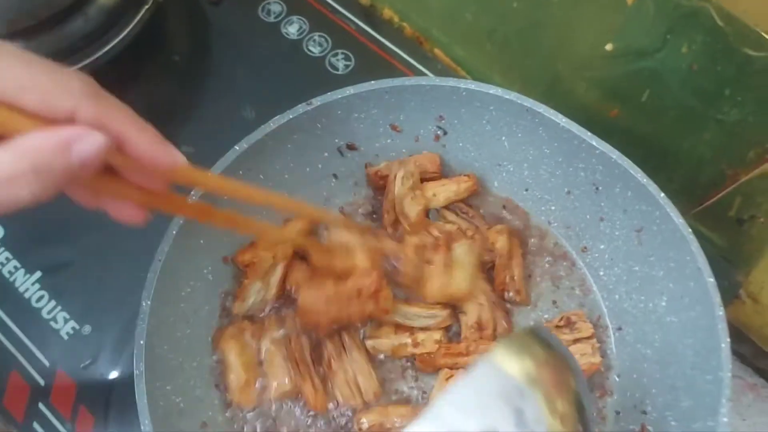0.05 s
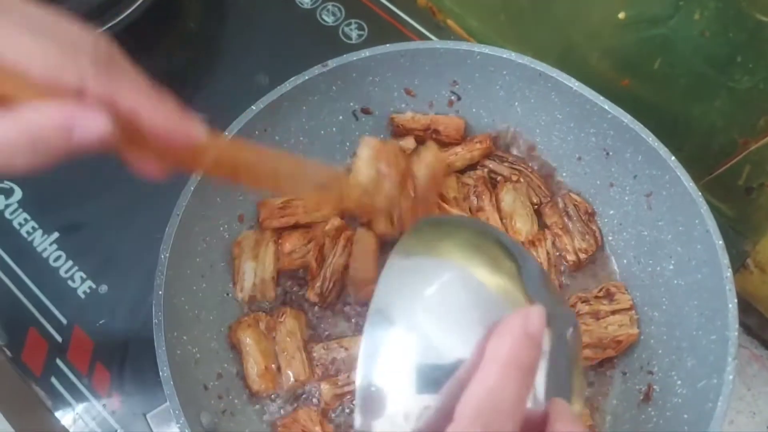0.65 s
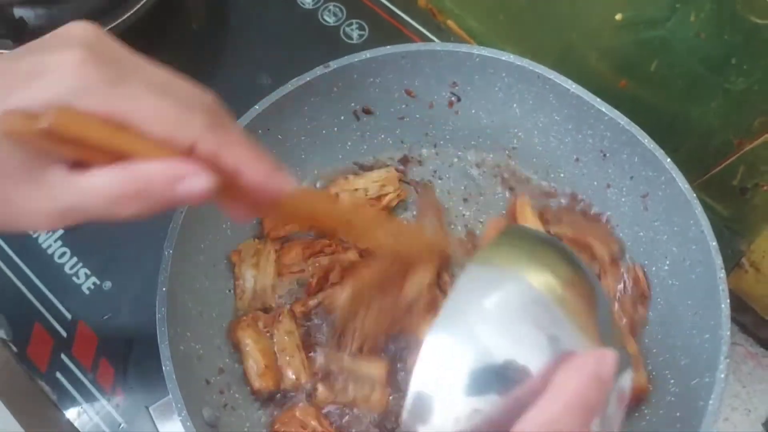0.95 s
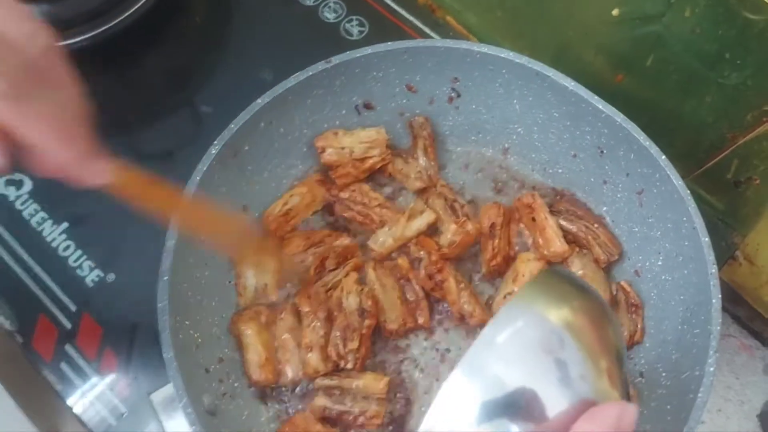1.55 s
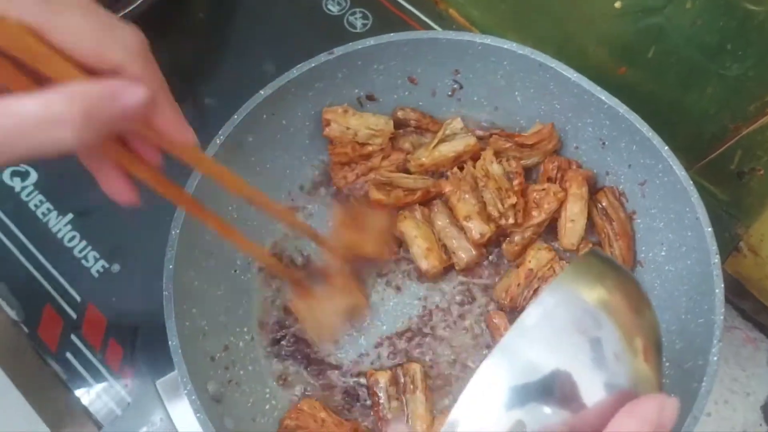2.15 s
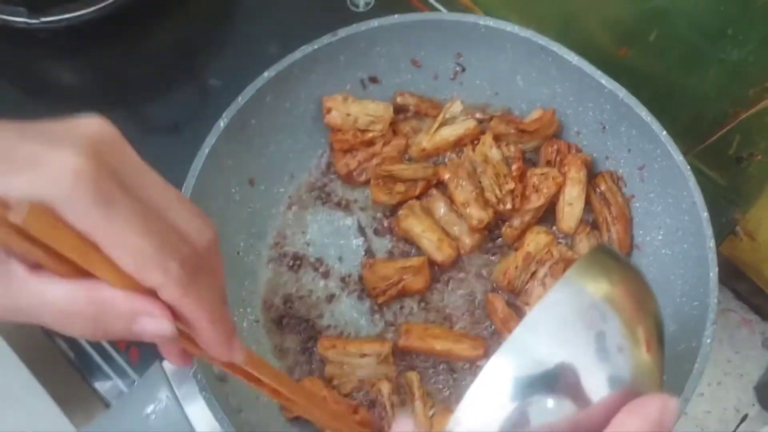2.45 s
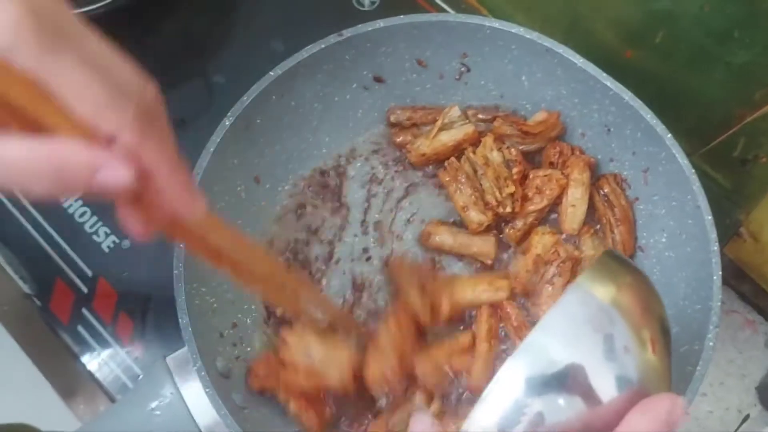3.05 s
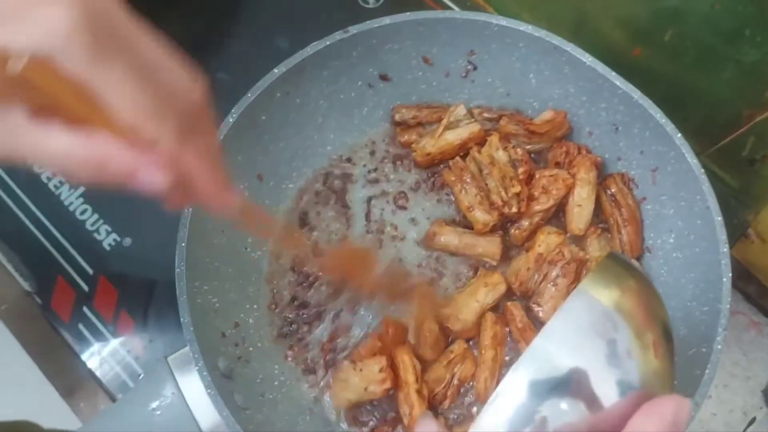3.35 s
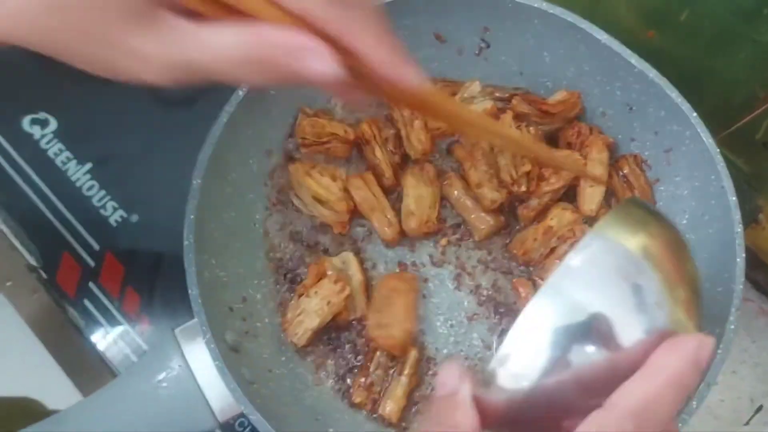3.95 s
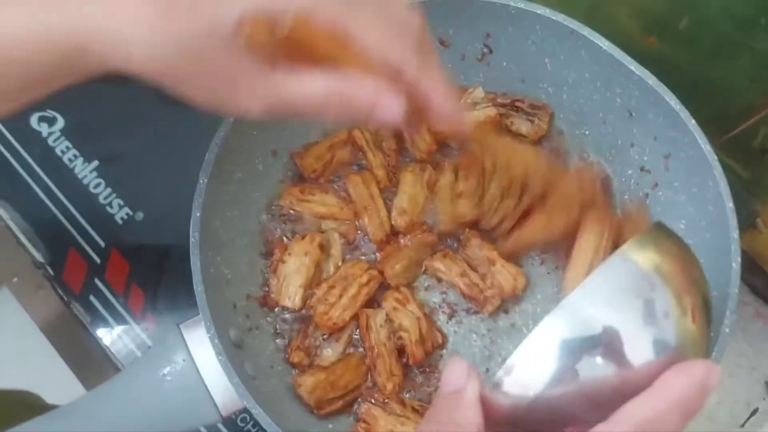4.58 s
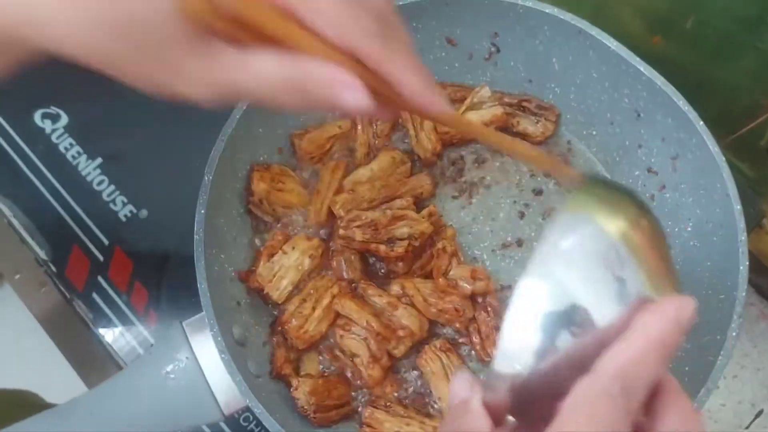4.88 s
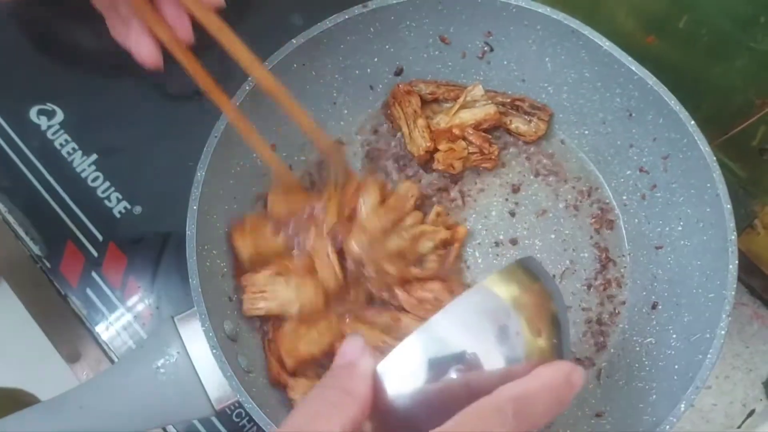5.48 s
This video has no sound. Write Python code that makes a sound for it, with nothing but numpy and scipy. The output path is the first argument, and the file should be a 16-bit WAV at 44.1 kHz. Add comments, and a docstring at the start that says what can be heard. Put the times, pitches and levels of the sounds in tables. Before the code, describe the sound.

Close, crackling sizzle of tofu strips frying in a little sauce, easing slightly, while an electric cooktop hums underneath.

```python
"""Tofu skin frying on an electric hob

Close above a nonstick pan, in stereo: strips of tofu skin fry in a little sauce, stirred with chopsticks.
Thousands of tiny bubbles burst, oil spits and a steel bowl beside the pan ticks now and then; underneath,
the hob hums and its fan blows. Late on, something (probably a finger) bumps the right microphone and
closes in on it, hollowing the sizzle on that side."""
import sys
import numpy as np
from scipy import signal
from scipy.fft import rfft, irfft, next_fast_len
from scipy.io import wavfile

SR = 44100
rng = np.random.default_rng(int(sys.argv[2]) if len(sys.argv) > 2 else 0)


def output_pcm(signal):
    """Save a mono or channel-first signal as 16-bit PCM at the path in sys.argv[1].

    Samples are clipped to [-1, 1] before scaling.
    """
    pcm = np.clip(np.atleast_2d(signal).T, -1, 1) * 32767
    wavfile.write(sys.argv[1], SR, np.round(pcm).astype(np.int16))


N = 243431
TIME = np.arange(N) / SR
AGE = TIME[:SR // 6]   # time since a blow
PADDED = next_fast_len(N, real=True)
FREQS = np.maximum(np.fft.rfftfreq(PADDED, 1 / SR), 1)


def from_db(db):
    """Decibels to gain."""
    return 10 ** (np.asarray(db) / 20)


def panned(balance_db):
    """Left and right gains; a positive balance leans left."""
    return from_db(np.array([[.5], [-.5]]) * balance_db)


def in_time(rows):
    """Each column of a curve, sample by sample."""
    s, *columns = np.transpose(rows)
    return [np.interp(TIME, s, column) for column in columns]


def at_hz(points):
    """A curve read at every frequency, on a log axis."""
    hz, value = np.transpose(points)
    return np.interp(np.log(FREQS), np.log(hz), value)


def as_wave(spectrum):
    """From a stereo spectrum to sound, with rms 1 in the middle of the pair."""
    wave = irfft(spectrum, PADDED)[:, :N]
    return wave / np.sqrt(np.mean(wave.mean(0) ** 2) + 1e-20)


def wander(step_s):
    """A new random value at every step, joined by straight lines."""
    return np.interp(TIME / step_s, np.arange(400), rng.standard_normal(400))


def hump(x, centre, width):
    """A bell curve of height 1."""
    return np.exp(-((x - centre) / width) ** 2)


def band(x, hz, octaves):
    """A broad, quickly dying resonance."""
    edges = np.clip([hz * 2 ** (-octaves / 2), hz * 2 ** (octaves / 2)], [10, 20], [SR * .42, SR * .48])
    return signal.sosfilt(signal.butter(1, edges, "band", fs=SR, output="sos"), x + 1e-18)


def burst(t60):
    """A sudden puff of stereo noise that dies away."""
    return rng.standard_normal((2, len(AGE))) * from_db(-60 * AGE / t60)


def lingering(energy, t60):
    """Energy spread out over a dying echo."""
    decay = 10 ** (-6 / (t60 * SR))
    return signal.lfilter([1 - decay], [1, -decay], energy + 1e-18)


def add(out, s, sound):
    """Mix a short sound in at a moment."""
    start = round(s * SR)
    out[:, start:start + sound.shape[-1]] += sound[:, :N - start]


# Fan and rumble under the pan: (frequency [Hz], relative density [dB])
FAN_SPECTRUM = [(70, -29), (125, -14.5), (167, -9.5), (205, -11), (285, -13), (335, -9), (460, -14.5),
                (525, -13.5), (600, -13.5), (720, -2.5), (790, -5.5), (870, -2.5), (1060, -8), (1210, -6.5),
                (1400, -8.5), (1900, -36), (3000, -90)]
RUMBLE_SPECTRUM = [(20, -24), (35, -19), (52, 2), (66, -7), (85, -0.5), (125, -6), (160, -7.5),
                   (250, -29.5)]
# Where both sit between the microphones: (frequency [Hz], left minus right [dB])
AIR_BALANCE = [(150, -3), (350, -0.5), (520, -6.5), (700, -0.5), (1000, 3), (1250, -4.5)]
# How alike they are at the two microphones: (frequency [Hz], correlation [0-1])
AIR_CORRELATION = [(40, .75), (100, 0.99), (300, 0.85), (750, 0.77), (1300, 0.76)]
# Brief dips in hum and rumble: (time [s], gain [dB])
HUM_DIPS = [(0.72, -4), (1.4, -4), (2.92, -4)]


def hob(hum_hz=100.05, hum_db=-40, growth_db_per_s=1.04, waver_db=0.57, rumble_db=-16.5, fan_db=-38):
    """The hob hums at twice the mains rate, a faint rumble in step; its fan blows through the vents."""
    hum = np.sqrt(2) * np.sin(2 * np.pi * hum_hz * TIME) * panned(-2.2)
    mid, side = rfft(rng.standard_normal((2, PADDED)))
    alike = at_hz(AIR_CORRELATION)
    air = np.sqrt(1 + alike) * mid + np.sqrt(1 - alike) * side * [[1], [-1]]
    air *= panned(at_hz(AIR_BALANCE))
    fan = from_db(fan_db) * as_wave(air * from_db(at_hz(FAN_SPECTRUM)))
    rumble = from_db(rumble_db) * as_wave(air * from_db(at_hz(RUMBLE_SPECTRUM)))
    dips_db = sum(db * hump(TIME, s, width=0.031) for s, db in HUM_DIPS)
    level_db = hum_db + growth_db_per_s * TIME + dips_db + waver_db * wander(step_s=0.1)
    return from_db(level_db) * (hum + rumble) + fan


def microphone_bump(at_s=4.3344, thud_db=-8.5, scuff_db=-19, start_hz=720, end_hz=85,
                    glide_s=0.00195, rise_s=0.00037, t60=0.04):
    """A soft knock on the right microphone: a pressure swing that slows as it dies, and a light scuff."""
    hz = end_hz + (start_hz - end_hz) * np.exp(-AGE / glide_s)
    envelope = (1 - np.exp(-AGE / rise_s)) * from_db(thud_db - 60 * AGE / t60)
    thud = envelope * np.sin(2 * np.pi * np.cumsum(hz) / SR)
    scuff = from_db(scuff_db) * band(burst(t60=.025), hz=900, octaves=1.7)
    out = np.zeros((2, N))
    add(out, at_s, (thud + scuff) * [[0], [1]])
    return out


# The gap closing at the right microphone: (time [s], lowest notch [Hz], resonance height [dB])
GAP_CLOSING = [(4.42, 16000, 0), (4.52, 11630, 0), (4.6, 8300, 0), (4.66, 6240, 4), (4.72, 3950, 2),
               (4.79, 2980, 2), (4.9, 2660, 2), (5.15, 2340, 1), (5.5, 2350, 1)]
# Its notches: (centre [x lowest notch], width [x lowest notch], gain when sealed [dB])
GAP_NOTCHES = [(1, .2, -11), (2.07, .22, -6.5), (3.15, .25, -5), (4.0, .25, -4), (5.6, .4, -2)]
# Its resonances: (centre [x lowest notch], width [x lowest notch])
GAP_RESONANCES = [(1.7, .28), (3.5, .4)]


def closing_gap(x, start_s=4.4, fade_in_s=.24, tremble_octaves=0.05, leak_hz=8000, top_hz=15200):
    """Notches and resonances slide and tremble with the gap's width; nearly shut, it rings up top."""
    hz, s, frames = signal.stft(x, SR, nperseg=512)
    hz = hz[:, None]
    notch_hz, height_db = in_time(GAP_CLOSING)
    lowest_hz = np.interp(s, TIME, notch_hz * 2 ** (tremble_octaves * wander(step_s=0.063)))
    multiple = hz / lowest_hz
    sealed = 1 / np.sqrt(1 + (lowest_hz / leak_hz) ** 2)
    colour_db = 0
    for centre, width, db in GAP_NOTCHES:
        uneven = 1 + 0.29 * np.interp(s, TIME, wander(step_s=0.066))
        colour_db += db * sealed ** centre * uneven * hump(multiple, centre, width)
    for centre, width in GAP_RESONANCES:
        colour_db += np.interp(s, TIME, height_db) * hump(multiple, centre, width)
    cavity_db = 2 * hump(hz, centre=11100, width=700) + 4 * hump(hz, top_hz, width=1000)
    colour_db += cavity_db * np.clip(top_hz / lowest_hz - 1, 0, 1)
    fade_in = np.clip((s - start_s) / fade_in_s, 0, 1)
    return signal.istft(frames * from_db(fade_in * colour_db), SR)[1][:N]


# Modes of the steel bowl, held beside the pan: (frequency [Hz], relative level [dB], t60 [s])
BOWL_MODES = [(6020, -4, .026), (6170, -8, .02), (6315, -1, .028), (6495, -6, .024), (6630, -9, .018),
              (7880, -8, .025), (8400, -11, .022), (9600, -8, .025), (9880, -6, .028), (10110, -4, .034),
              (10750, -7, .025), (11070, -7, .018), (11750, -8, .018), (12700, -8, .018), (14700, -9, .012)]
# Touches on it: (time [s], ring gain [dB], knock gain [dB], left minus right [dB], tilt [dB/octave])
BOWL_TAPS = [(1.727, -13, -30, -1, 7), (3.706, -12.5, -18, 5, 0), (3.7075, -13.5, -20, 0, 0),
             (3.728, -31, -16, 0, -3), (5.4046, -6.5, -22, 0, 6), (5.406, -7.5, -29, -7, -2),
             (5.412, -15, -36, -10, 1)]


def bowl_taps(ring_db=-9, clatter_db=-20):
    """Each touch rings the bowl's modes, damped by the hand, over the dry knock of the chopstick."""
    out = np.zeros((2, N))
    hz, mode_db, t60 = np.transpose(BOWL_MODES)[:, :, None]
    for s, gain_db, knock_db, balance_db, tilt_db in BOWL_TAPS:
        phases = rng.uniform(0, 2 * np.pi, (2, len(BOWL_MODES), 1))
        envelopes = from_db(ring_db + mode_db + tilt_db * np.log2(hz / hz[0]) - 60 * AGE / t60)
        ring = (envelopes * np.sin(2 * np.pi * hz * AGE + phases)).sum(1)
        clatter = from_db(clatter_db + tilt_db) * band(burst(t60=0.029), hz=12000, octaves=1)
        knock = from_db(knock_db) * band(burst(t60=0.033), hz=3200, octaves=3.2)
        add(out, s, from_db(gain_db) * panned(balance_db) * (ring + clatter) + knock)
    return out


# Wet strips meeting hot metal: (time [s], length [s], typical bubble level [dB], pitch [Hz])
WET_SPUTTERS = [(0.22, 0.018, -19, 4130), (0.262, 0.03, -21, 4150), (0.333, .012, -23, 3030),
                (1.52, .06, -28, 4170), (1.61, 0.05, -23, 4030), (1.885, .02, -24, 4060),
                (2.769, 0.033, -34, 4320), (3.211, 0.024, -24, 4030), (3.26, 0.033, -36, 4300),
                (3.515, 0.031, -25, 4140), (3.608, 0.02, -27, 4200), (3.768, 0.033, -22.5, 3900),
                (4.843, .04, -26, 4100), (5.049, 0.021, -24.5, 3670)]


def sputters(stray_per_s=4, bubble_count=14, scatter_octaves=0.056, t60=0.0062, spread_db=3):
    """Quick clusters of like-sized bubbles, each ringing briefly; stray clusters come at random."""
    out = np.zeros((2, N))
    age = AGE[:SR // 40]
    chance = rng.random((round(stray_per_s * N / SR), 2))
    strays = [(when * TIME[-1], .015, -27, 2300 * 3 ** pitch) for when, pitch in chance]
    for s, length, level_db, hz in list(WET_SPUTTERS) + strays:
        for when, pitch, size, phase in rng.uniform(-1, 1, (bubble_count, 4)):
            bubble_hz = hz * 2 ** (scatter_octaves * pitch)
            ring = np.sin(2 * np.pi * bubble_hz * age + np.pi * phase * np.array([[0], [1]]))
            envelope = from_db(level_db + spread_db * size - 60 * age / t60)
            add(out, s + length * (when + 1) / 2, panned(-2) * envelope * ring)
    return out


# Spits from the pan at set moments: (time [s], gain [dB], pitch [Hz], left minus right [dB])
OIL_SPITS = [(0.323, -13, 4000, -5.5), (1.3882, -19, 11000, -5), (2.11, -13, 9000, -3),
             (2.176, -16, 7000, -4), (2.3997, -17, 3070, -4.5), (2.5194, -22, 3130, -4.0),
             (2.6289, -23, 9000, -1), (2.7367, -17, 7000, -1), (2.7731, -13, 9140, 0),
             (2.9607, -22, 8500, -6.5), (3.05, -16, 9000, -4), (3.2592, -17, 2900, -4.0),
             (3.3947, -18, 12500, -6), (3.8297, -15, 2820, -1), (3.83, -17, 12000, -1),
             (4.0694, -16, 11500, -4.0), (4.9935, -16, 13000, -5), (5.0554, -14, 11400, -3.5),
             (5.3393, -17, 10800, -6)]


def oil_spits(stray_per_s=4, crack_db=-1, spray_db=-4.5):
    """A larger drop bursts with a crack and a short spray; stray spits fall at random times and pitches."""
    out = np.zeros((2, N))
    chance = rng.random((round(stray_per_s * N / SR), 2))
    strays = [(when * TIME[-1], -16.5, 4500 * 3 ** pitch, -2) for when, pitch in chance]
    for s, gain_db, hz, balance_db in list(OIL_SPITS) + strays:
        crack = from_db(crack_db) * burst(t60=0.003)
        spray = from_db(spray_db) * burst(t60=0.064)
        add(out, s, from_db(gain_db) * panned(balance_db) * band(crack + spray, hz, octaves=0.86))
    return out


# Vigour of the frying, as heard in its finest fizz: (time [s], relative level [dB])
FRYING_VIGOUR = [(0.0, -29), (0.97, -33.5), (1.03, -31.5), (1.92, -31.5), (2.93, -40.5), (2.98, -35.5),
                 (4.17, -40), (5.35, -37)]


def oil_swing_db(share=0.39):
    """The oil crackles more or less as the frying gains or loses vigour."""
    vigour_db, = in_time(FRYING_VIGOUR)
    return share * (vigour_db - vigour_db.mean())


def droplet_snaps(per_s=30, gain_db=-8.5, spread_db=2.5):
    """The tiniest droplets snap in a single sharp click, most of them nearer one microphone."""
    at = np.flatnonzero(rng.random(N) < per_s / SR)
    size, side, sign = rng.uniform(-1.7, 1.7, (len(at), 3)).T
    clicks = np.zeros((2, N))
    clicks[:, at] = np.sign(sign) * from_db(gain_db + spread_db * size) * panned(-2 + 5 * side)
    return from_db(oil_swing_db()) * band(clicks, hz=12000, octaves=2.6)


# Brief swells, dips and narrow rings in the sizzle, some from stirring:
# (time [s], length [s], left swell [dB], right swell [dB], pitch [Hz], width [octaves])
SIZZLE_SWELLS = [(0.0, 0.78, .5, 3, 4160, .12), (0.05, 0.08, 3.5, 5, 3300, 0.97),
                 (0.13, 0.24, 2, 3, 4200, 1.3), (0.38, 0.26, 1.5, 1.5, 4200, .8),
                 (0.933, 0.17, 1.5, 3.5, 2670, .8), (1.073, 0.42, -3, -1.5, 2690, 1.2),
                 (1.07, .17, -2, 2.5, 13000, .6), (1.49, 0.15, 0, 1.5, 3600, 1.0),
                 (1.54, 0.13, 0, 3, 14000, 0.18), (1.88, .11, -1, 1.5, 9500, 1.0),
                 (1.905, 0.1, 5, 4, 2620, 1.1), (2.089, 0.073, 4.5, 3.5, 3000, 1.7),
                 (2.275, 0.086, 2.5, 2.5, 2400, 1.0), (2.888, 0.092, -5, -4, 4800, 1),
                 (2.95, 0.072, 1, 2, 2800, 1.0), (3.288, 0.058, -3.5, -1, 5000, 2.1),
                 (3.33, .42, -2, 0.5, 8000, 0.89), (3.8, 0.61, 5, 2.5, 1450, 0.74),
                 (3.85, 0.15, 1, 3, 6400, 0.82), (4.022, 0.63, -3, 0, 7500, 1.2),
                 (4.37, .07, 1, 6, 12800, .25), (4.44, .13, 0, -4, 11000, .7),
                 (4.537, .26, 2.5, -1, 2600, 1.7), (4.673, 0.15, 2, 3, 12500, 0.63),
                 (4.88, 0.49, -2, 0.5, 6100, 0.41), (4.95, 0.54, 4.5, 1, 1760, .3)]


def swells_and_dips(x, jostle_db=0.76, attack_s=0.031, release_s=0.028):
    """The sizzle briefly swells or thins around one pitch or another; small nudges jostle it throughout."""
    jostle = from_db(jostle_db * wander(step_s=.06)) - 1
    out = x + jostle * band(x, hz=3300, octaves=1.4)
    for s, length, left_db, right_db, hz, octaves in SIZZLE_SWELLS:
        span = slice(int(s * SR), int((s + length) * SR))
        age = TIME[span] - s
        envelope = np.clip(np.minimum(age / attack_s, (length - age) / release_s), 0, 1)
        swell = from_db([[left_db], [right_db]]) - 1
        out[:, span] += swell * envelope * band(x[:, span], hz, octaves)
    return out


def bubbles(per_s=7000, bands=14, clump_db=1.67, wall_db=0.5, wall_t60=0.08, room_db=1):
    """Bubbles burst in random clumps; each is a click, echoes off the pan wall and a wash in the room."""
    out = 0
    # the smallest, highest bubbles vary most in strength
    for hz, spread_db in zip(np.geomspace(1100, 17000, bands), np.linspace(3.5, 4, bands)):
        clumps = from_db(clump_db * np.repeat(rng.standard_normal(N // 800 + 1), 800)[:N])
        at = np.flatnonzero(rng.random(N) < per_s * clumps / bands / SR)
        sizes = from_db(spread_db * np.minimum(rng.exponential(1, len(at)), 4.5))
        sizes *= rng.choice([-1, 1], len(at))
        clicks = np.zeros((2, N))
        clicks[0, at] = sizes
        # each spot of the pan has its own path difference to the two microphones
        clicks[1, (at + rng.integers(-7, 6, len(at))) % N] = sizes
        clicks /= clicks.std()
        wall_energy = from_db(wall_db) ** 2 * lingering(clicks[0] ** 2, wall_t60)
        wash = np.sqrt(wall_energy + from_db(room_db) ** 2) * rng.standard_normal((2, N))
        out = out + band(clicks + wash, hz, octaves=0.85)
    return out


# Colour of the pan at each microphone, close above it: (frequency [Hz], relative gain [dB])
PAN_COLOUR_LEFT = [(300, -13.5), (540, -17.6), (720, -5.5), (950, 2), (1550, -5.5), (2400, -4.5),
                   (4200, -3.5), (6100, -9), (7200, -13.5), (8200, -13), (8800, -7.5), (11300, -6),
                   (13500, -8), (15300, -19)]
PAN_COLOUR_RIGHT = [(300, -12.5), (580, -11.8), (740, -6), (1040, 3), (1250, 0), (1950, -1), (3000, 0.5),
                    (3700, -0.5), (4200, 1), (5300, -3.5), (7400, -7.5), (10800, -5.5), (12500, 0.5),
                    (15300, -4.5)]
# Hollow resonances of the pan: (frequency [Hz], width [Hz], gain [dB])
PAN_RESONANCES = [(1182, 59, 7.5), (1740, 110, -1.5), (2380, 270, 2.5), (2970, 83, 1.5)]


def sizzle(sauce_hz=1252, oil_hz=5310, fizz_hz=11400, sauce_db=-30.5, drying_db_per_s=0.98, oil_db=-34):
    """Sauce slowly boils away in the middle range, oil crackles and fizzes above; the pan colours all."""
    rings_db = sum(db / (1 + (2 * (FREQS - hz) / width) ** 2) for hz, width, db in PAN_RESONANCES)
    colour_db = np.array([at_hz(PAN_COLOUR_LEFT), at_hz(PAN_COLOUR_RIGHT)])
    spectrum = rfft(bubbles(), PADDED) * from_db(rings_db + colour_db)
    # soft high-passes at the lower edge of each range
    sauce_up, oil_up, fizz_up = [1 / (1 + (hz / FREQS) ** 10) for hz in (sauce_hz, oil_hz, fizz_hz)]
    sauce = from_db(sauce_db - drying_db_per_s * TIME) * as_wave(spectrum * (sauce_up - oil_up))
    oil = from_db(oil_db + oil_swing_db()) * as_wave(spectrum * (oil_up - fizz_up))
    fizz = from_db(in_time(FRYING_VIGOUR)[0] - 2) * as_wave(spectrum * fizz_up)
    return sauce + oil + fizz


def scene():
    """Pan, bowl and hob, from a pair of microphones close above."""
    left, right = swells_and_dips(sizzle()) + sputters() + oil_spits() + droplet_snaps()
    return np.array([left, closing_gap(right)]) + bowl_taps() + hob() + microphone_bump()


def record(dry):
    """The top is cut steeply above 15.8 kHz."""
    return signal.sosfilt(signal.ellip(12, .1, 80, 15800, fs=SR, output="sos"), dry)


dry = scene()
out = record(dry)
output_pcm(out)
```